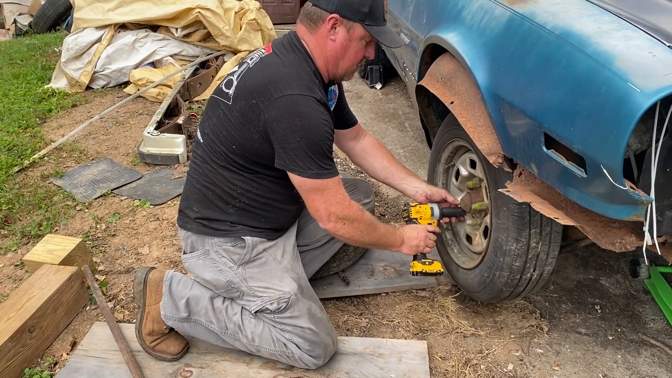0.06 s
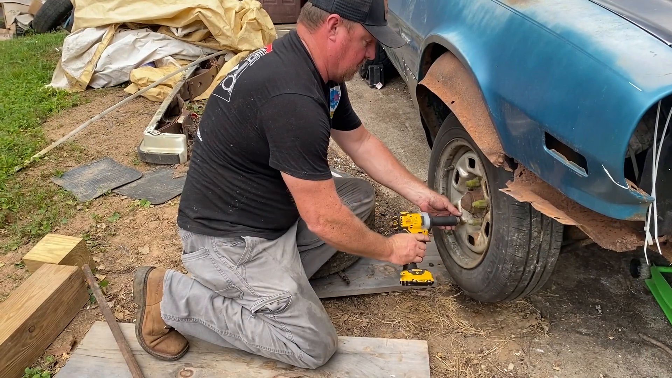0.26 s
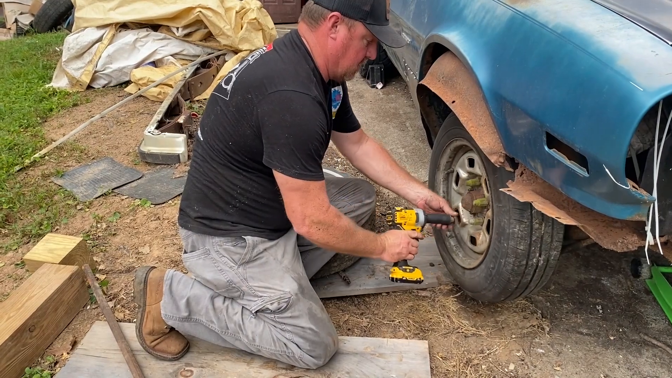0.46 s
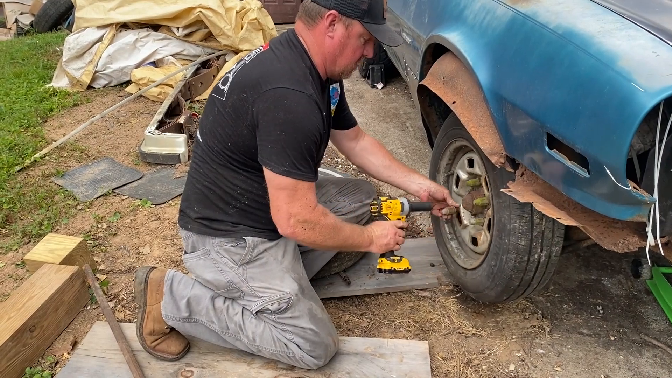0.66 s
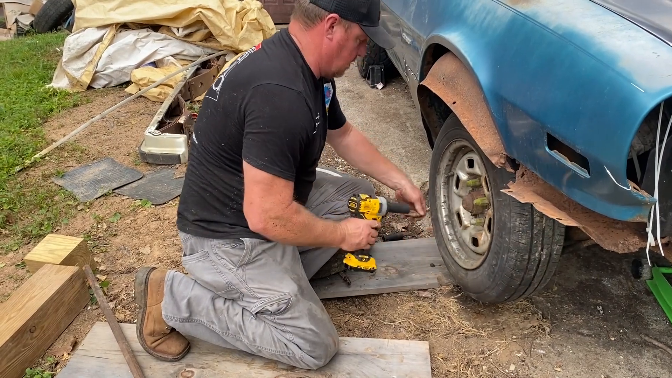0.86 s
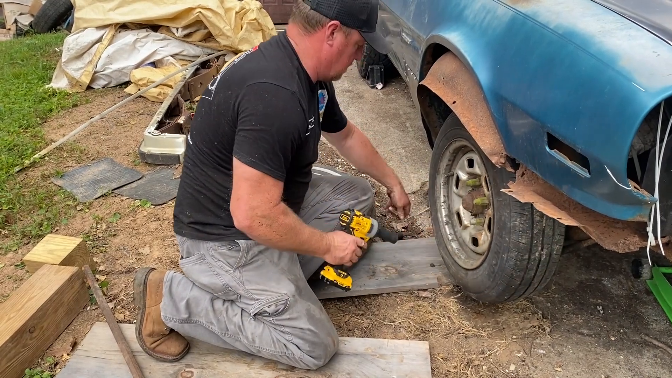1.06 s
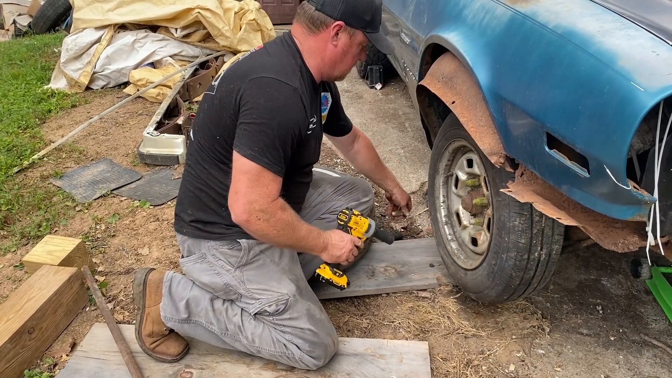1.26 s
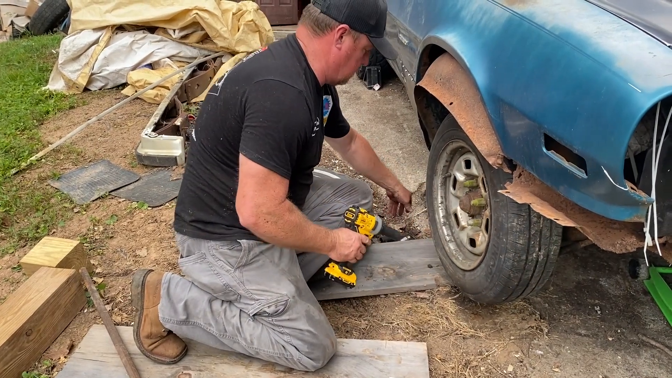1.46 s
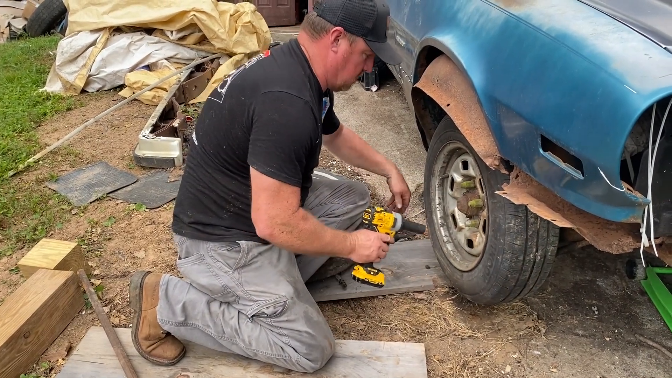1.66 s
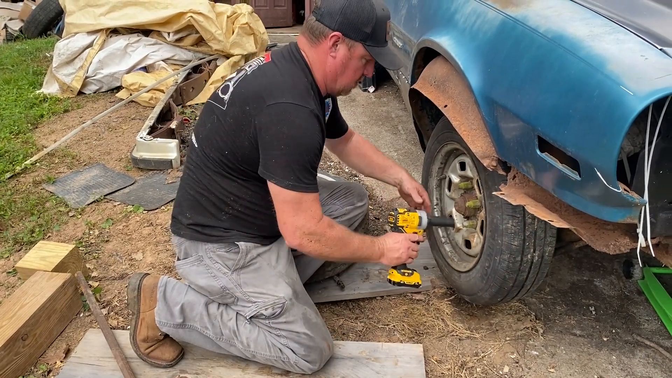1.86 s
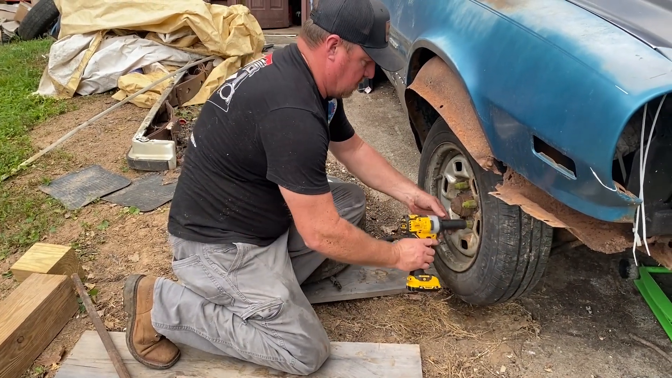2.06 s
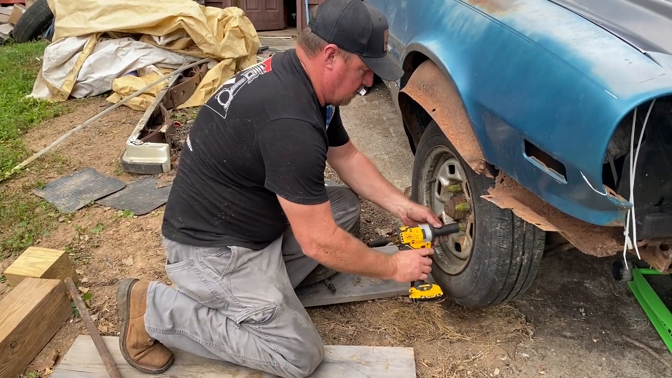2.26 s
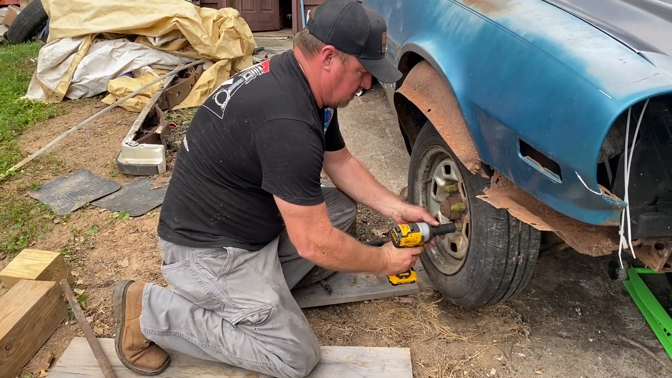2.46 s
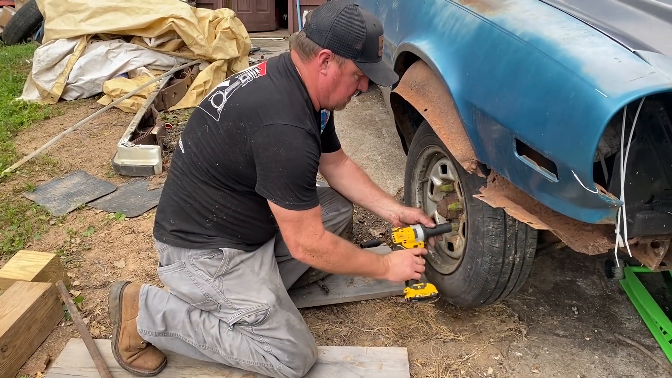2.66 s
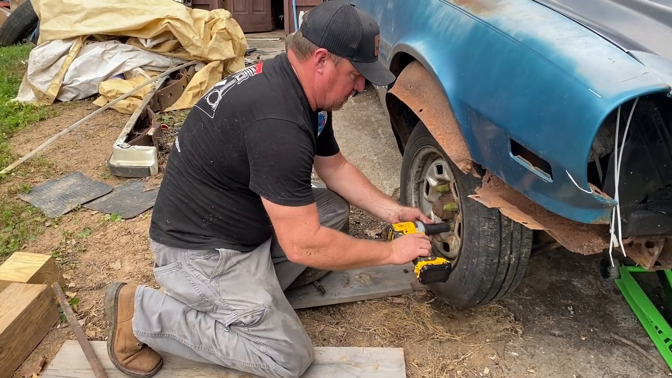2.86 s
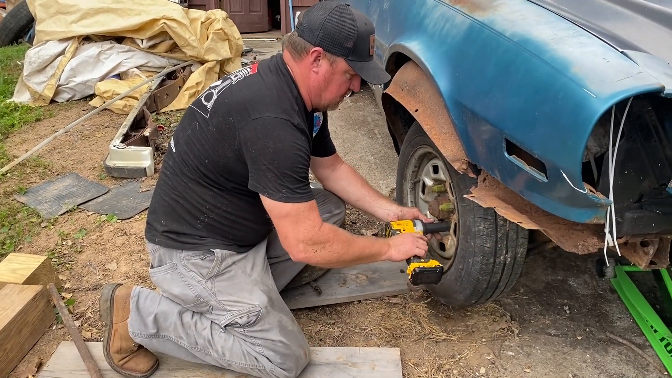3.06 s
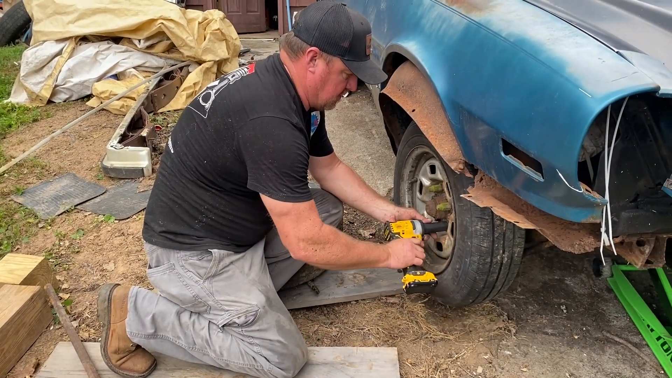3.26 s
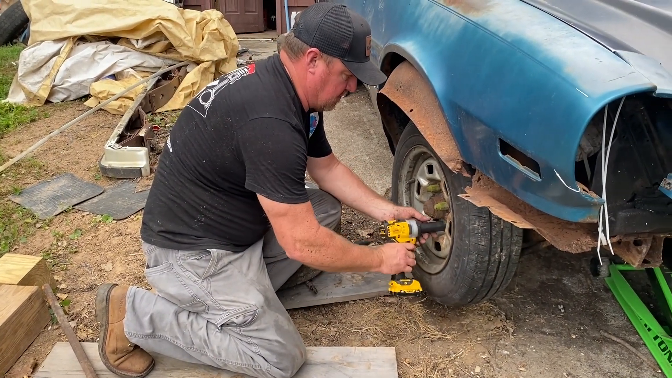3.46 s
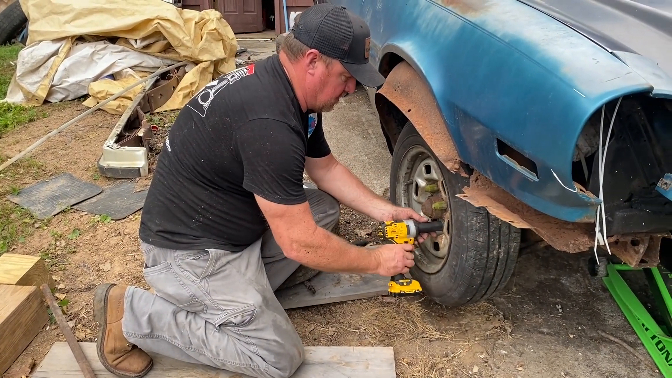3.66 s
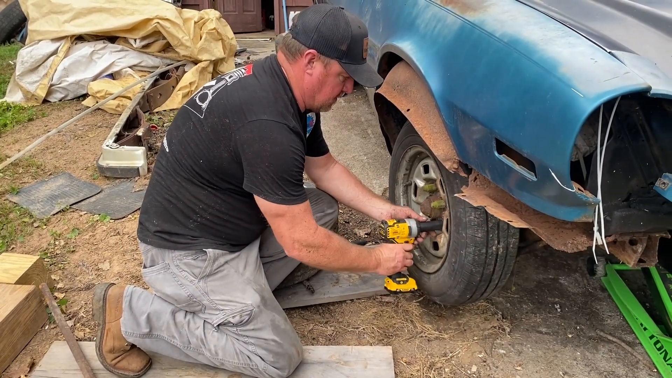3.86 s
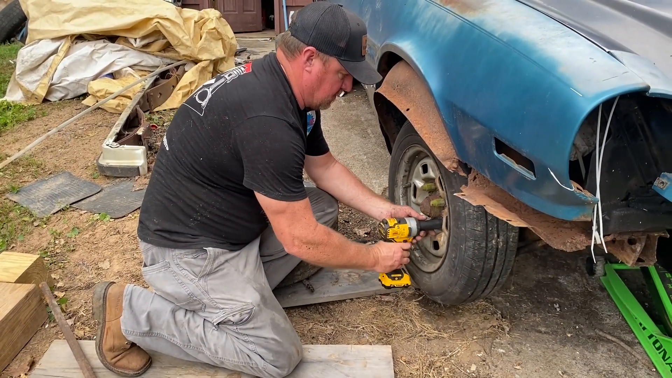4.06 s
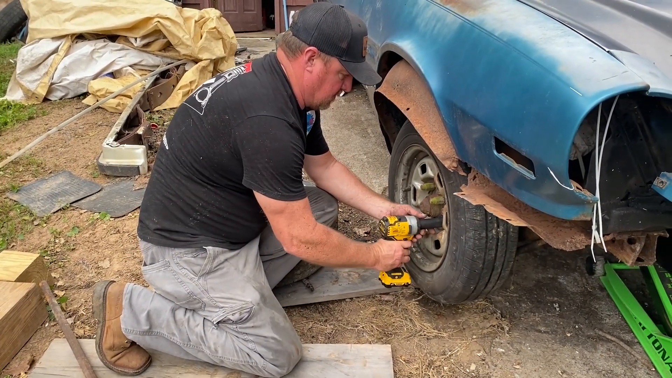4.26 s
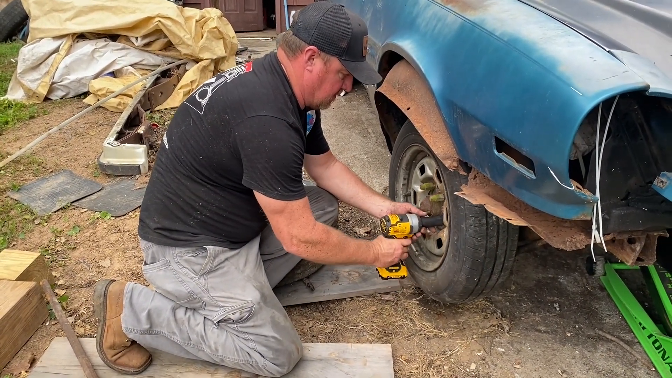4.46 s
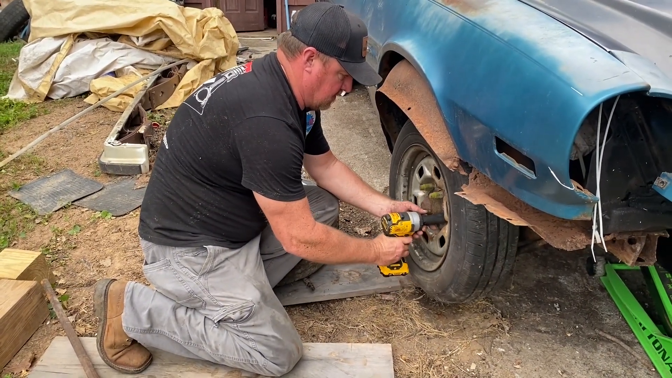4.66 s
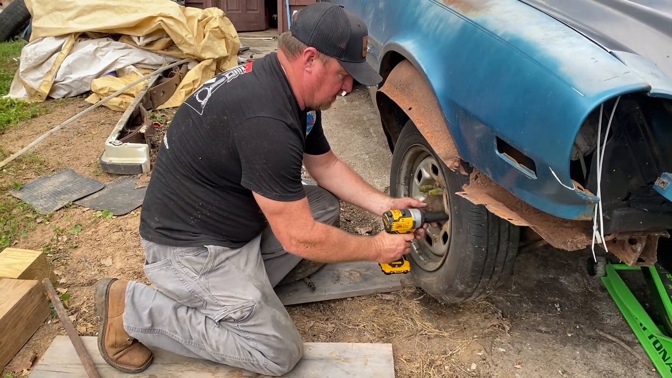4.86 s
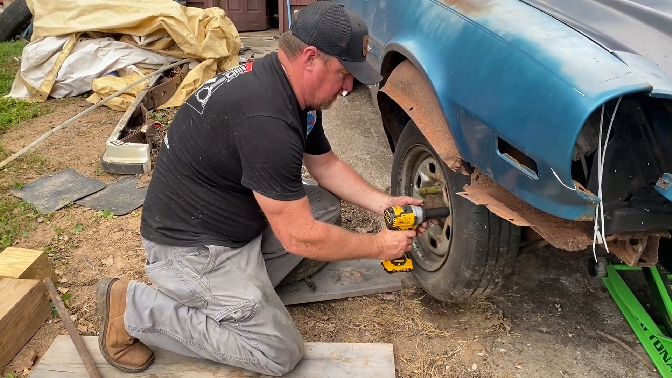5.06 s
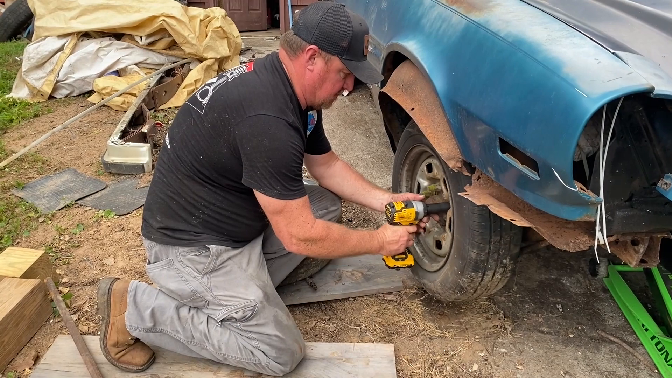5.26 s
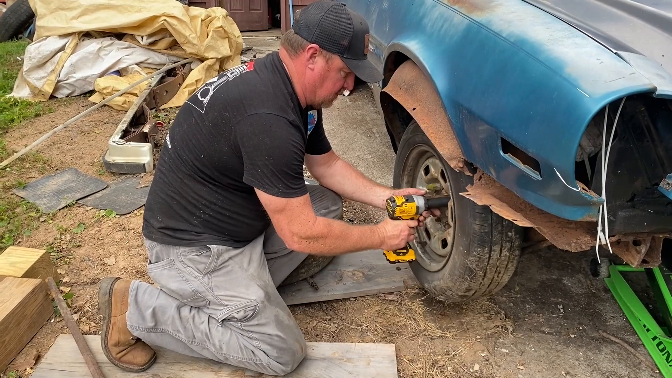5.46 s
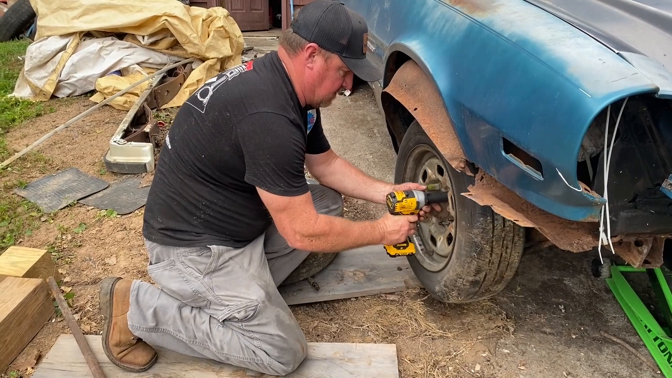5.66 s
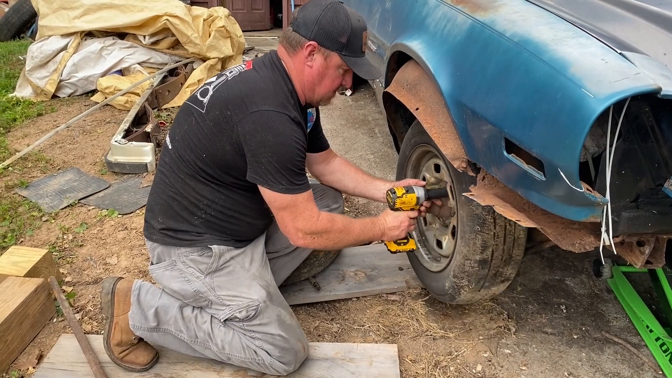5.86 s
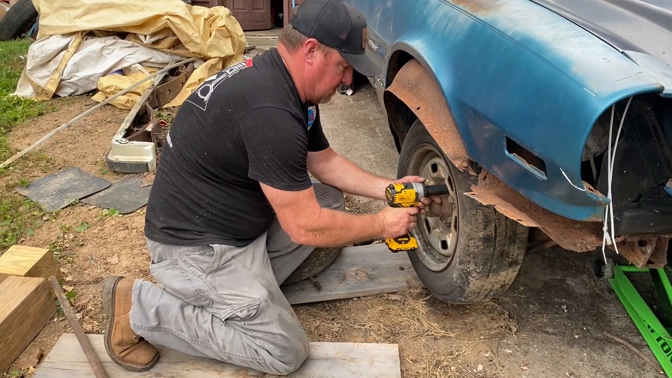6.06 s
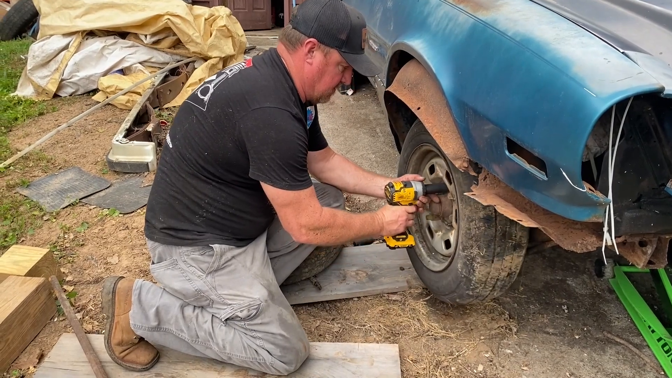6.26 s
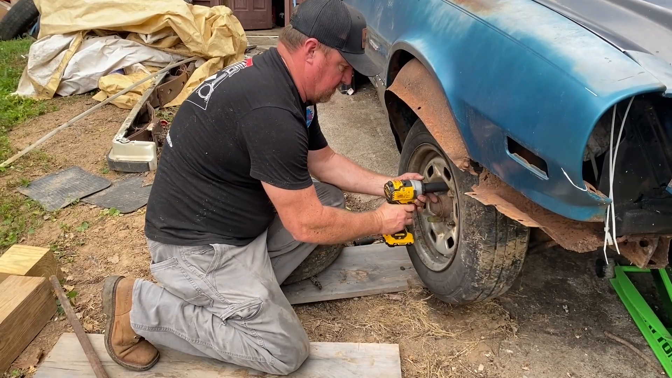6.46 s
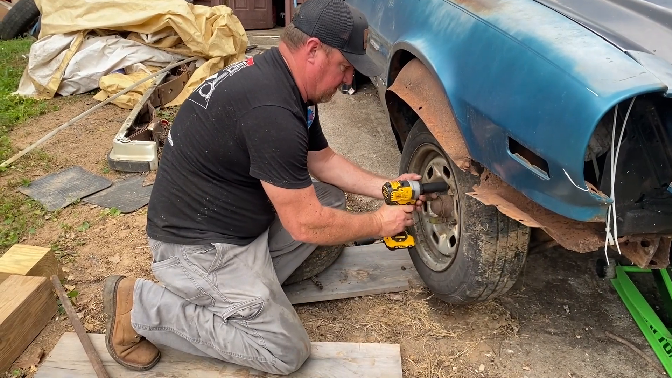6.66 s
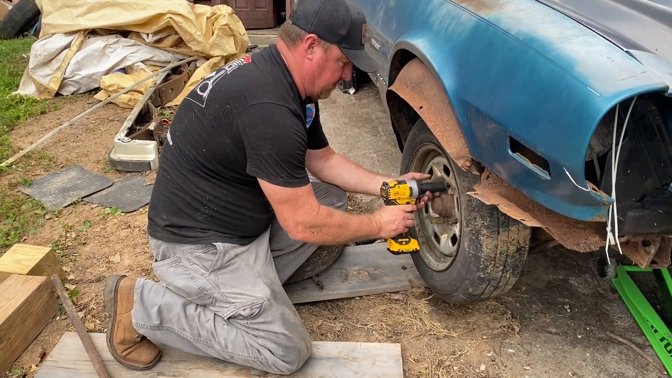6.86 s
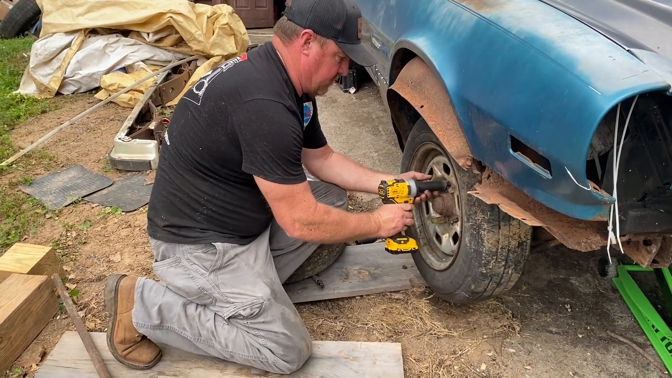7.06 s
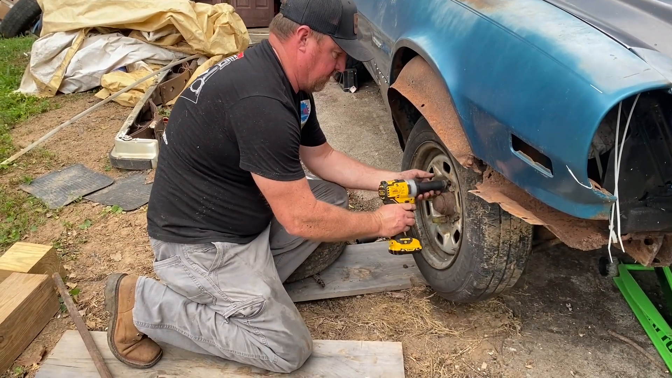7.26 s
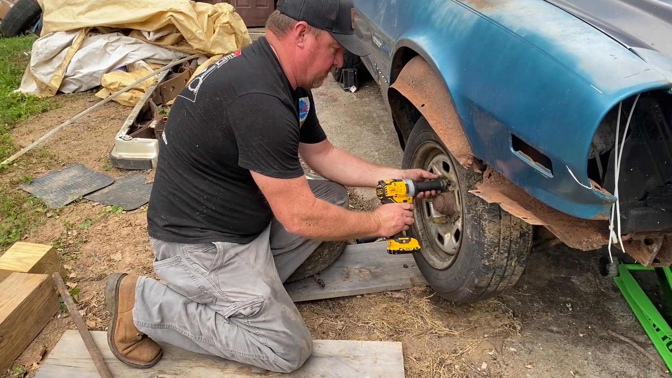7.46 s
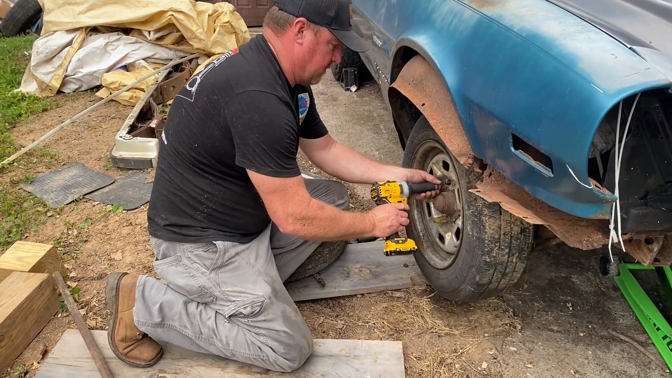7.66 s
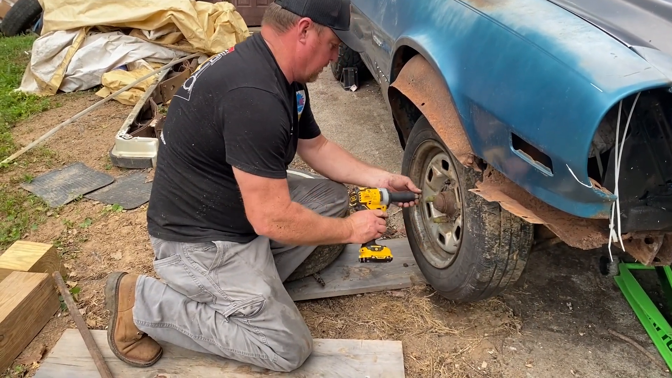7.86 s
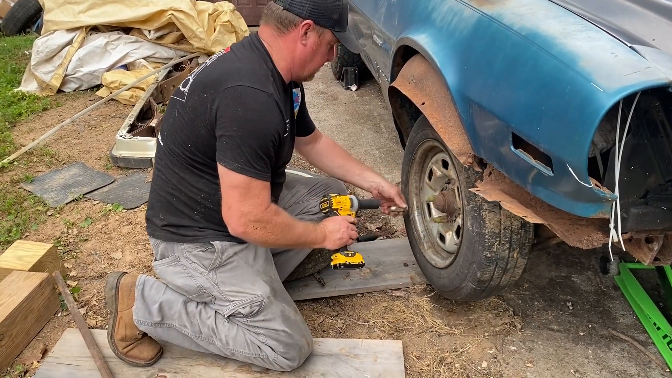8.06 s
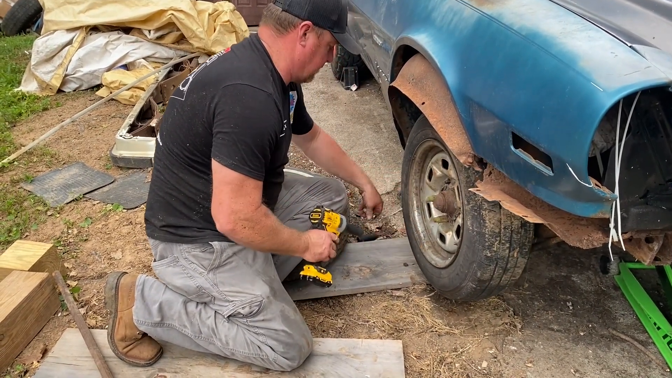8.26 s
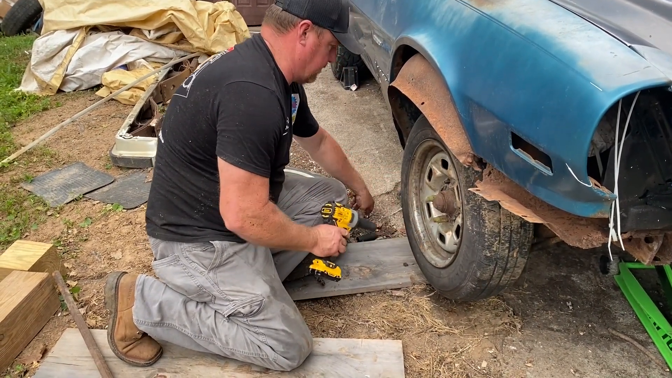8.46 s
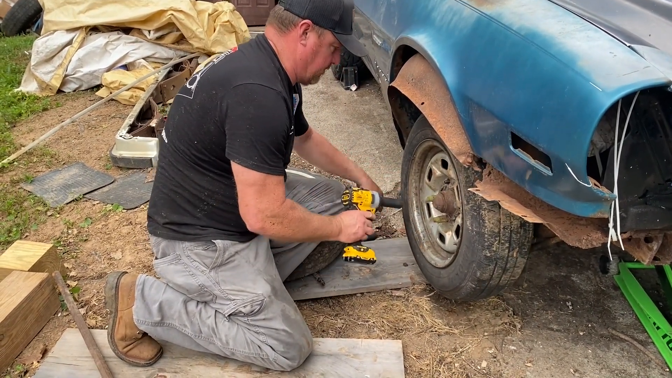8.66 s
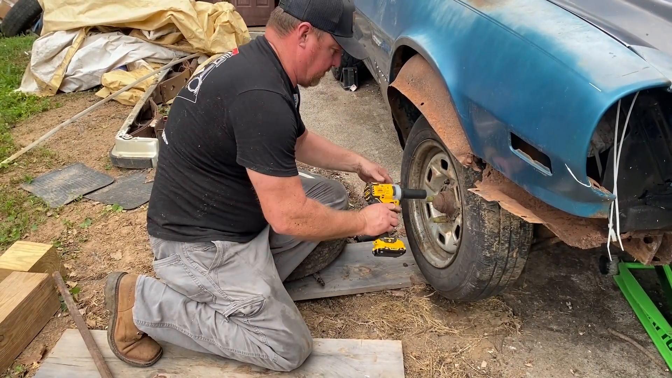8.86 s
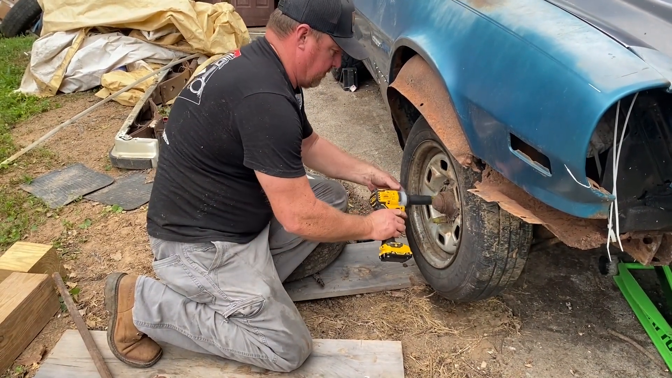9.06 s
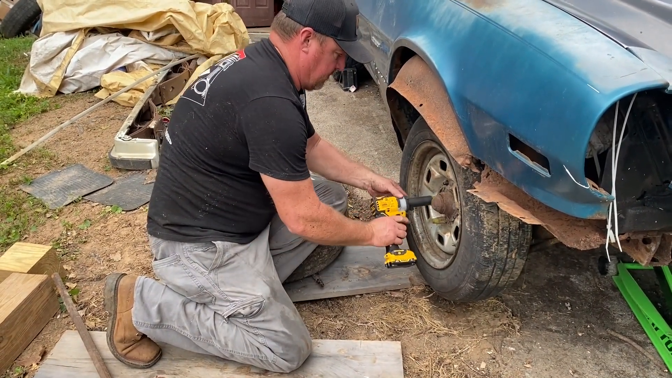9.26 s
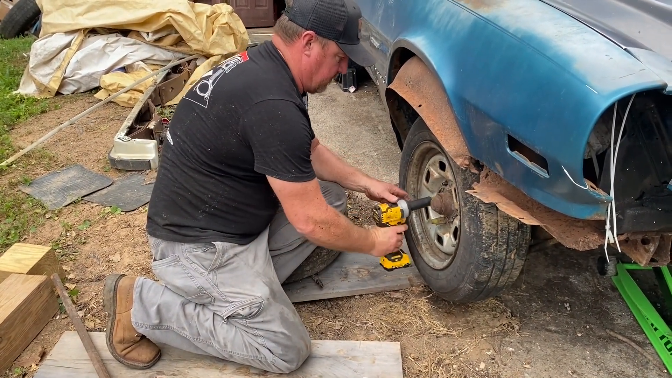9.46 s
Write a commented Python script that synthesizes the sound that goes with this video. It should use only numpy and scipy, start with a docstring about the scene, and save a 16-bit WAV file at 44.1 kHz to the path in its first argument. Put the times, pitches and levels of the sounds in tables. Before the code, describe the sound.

A few faint clinks and dull knocks come first as a socket is fitted to a car wheel nut. Then a nearby cordless impact wrench stutters twice and hammers loudly for about two seconds, each blow sharp and metallic. The blows slow, pick up for a moment, and give way to a brief motor whine. Nuts and socket click afterwards, while far traffic rumbles softly in the open air.

```python
"""Impact wrench on a car wheel

Outdoors, a cordless wrench hammers a lug nut loose: two short bursts, then a long one at about 51
blows a second. Each blow cracks and sets the steel ringing. The hammer slows to single clacks and
rattles again, then the whining motor spins free and brakes. Nuts and socket click against the
wheel before and after, and distant traffic rumbles."""
import sys
import numpy as np
from scipy import signal
from scipy.fft import rfft, irfft, next_fast_len
from scipy.io import wavfile
from scipy.ndimage import map_coordinates

SR = 44100
rng = np.random.default_rng(int(sys.argv[2]) if len(sys.argv) > 2 else 0)


def generate_wav(signal):
    """Clip the signal to [-1, 1] and save it as 16-bit WAV at the path in sys.argv[1]."""
    frames = np.transpose(np.atleast_2d(signal))
    scaled = np.clip(frames, -1, 1) * 32767
    pcm = np.round(scaled).astype(np.int16)
    wavfile.write(sys.argv[1], SR, pcm)


N = 418950
BLOW_RISE_S = .001  # how quickly a blow builds up at 2500 Hz

# The tone colour of a blow. Each row: frequency in Hz, level in dB.
BLOW_COLOUR = [(30, -34), (55, -4), (105, -8), (150, -9), (200, -5.5), (260, -13.5), (380, -6),
               (520, -10.5), (780, -2.5), (1050, 0.5), (1250, -1.5), (1500, 1), (2300, 2.5), (3000, 1.5),
               (3600, -3.5), (7500, -5), (9000, -4.5), (10500, -3.5), (12800, -8.5), (15300, 2.5),
               (16100, -27)]
# The ringing notes of the steel wheel. Each row: pitch in Hz, gain in dB, fade time in seconds.
WHEEL_NOTES = [(1110, -1, 0.11), (1365, 1, 0.08), (2020, 7.5, 0.08), (2115, 9, 0.07), (2262, 10, .06),
               (2630, 10, 0.08), (2717, 16.5, 0.14), (2776, 7, 0.05), (3258, 5, 0.05), (4850, -2, 0.012)]
# A nut sliding in the socket. Each row: pitch in Hz, gain in dB, fade time in seconds.
JINGLE_NOTES = [(1335, 9, 0.11), (2100, 7.5, 0.1), (3413, 1, .1), (4940, 8.5, 0.018)]


def hammer(blows, bright_db=2.5, second_jaw_gain=.3):
    """Each blow is a crack and a short clatter, whose pattern drifts as the socket turns."""
    # How a blow dies away. Each row: top of the band in Hz, fade times of the crack and of its
    # tail in seconds, tail level in dB.
    bands = [(700, .02, 0.11, 4), (1520, .015, 0.1, -11), (3300, 0.014, 0.06, -14.5),
             (7418, 0.006, 0.055, -14.5), (13000, 0.007, 0.043, -7), (17000, 0.01, 0.041, -1)]
    # How closely a blow repeats the last one. Each row: frequency in Hz, likeness from 0 to 1.
    likeness = [(700, .93), (1500, .7), (3300, .7), (7400, .5), (15000, .45)]
    # A loose nut thins the sound. Each row: frequency in Hz, change in dB.
    loose_colour = [(100, -0.5), (680, -0.5), (900, -6.5), (1500, -2.5), (2600, -6.5), (3500, -1.5),
                    (5200, -2.5), (7500, -.5), (11000, 2.5), (15000, -7)]
    t = np.arange(3072) / SR
    jaw_lag_s = np.abs(.0006 + .00025 * wobble(12))
    below = lambda hz, edge: 1 / (1 + (hz / edge) ** 10)
    out, low = np.zeros((2, N)), 0
    for high, crack_s, tail_s, tail_db in bands:
        onset = 1 - np.exp(-(t / BLOW_RISE_S) ** 2 * high / 2500)  # the treble arrives most sharply
        shape = onset * (fade(t, crack_s) + amp(tail_db) * fade(t, tail_s))
        keep = along(likeness, high)
        band, clatter = np.zeros((2, N)), rng.standard_normal((2, len(t)))
        for when, db, shine_db in blows:
            clatter = keep * clatter + np.sqrt(1 - keep ** 2) * rng.standard_normal(clatter.shape)
            treble_db = (shine_db + bright_db) * (low > 2500)  # a square hit brightens the crack
            burst = amp(db + treble_db) * evened(shape * clatter, high / 5)
            add(band, when, burst)
            if low > 1000:  # the hammer's second jaw lands a moment later
                add(band, when + jaw_lag_s[round(when * SR)], second_jaw_gain * burst)
        out += filtered(band, lambda hz: np.sqrt(np.abs(below(hz, high) - below(hz, low + 1))))
        low = high
    tight = filtered(out, lambda hz: unit(amp(along(BLOW_COLOUR, hz))))
    loose, = curves([(4.5, 0), (6.1, 1)])  # the nut comes free between these seconds
    return (1 - loose) * tight + loose * filtered(tight, lambda hz: amp(along(loose_colour, hz)))


def hammer_blows(run_db=-5, clack_db=-18, lead_s=.0012):
    """List each blow's time, level and brightness: runs that gather speed, and single clacks."""
    # Runs of hammering. Each row: start and end in seconds, number of blows, greatest lag while
    # gathering speed in seconds, then relative force, force lost and unevenness, all in dB.
    runs = [(3.3975, 3.559, 9, 0.0038, -21, 1.5, 0.84), (3.7492, 3.794, 3, 0.00048, -21.5, -2.5, 0.4),
            (3.9671, 4.2345, 14, 0.0052, -20.5, 4.5, 1.12), (4.2582, 4.295, 3, 0.00097, -30, 1, 1),
            (4.3214, 5.924, 83, .008, -25, 4.5, 1.96), (6.275, 6.515, 13, 0.0026, -30.5, -0.5, .5)]
    # The blows swell as the wrench is leaned on. Each row: time in seconds, change in dB.
    swell = [(3.8, -1.5), (3.97, -5), (4.05, 0.5), (4.12, -1), (4.17, -2.5), (4.35, -1.5), (4.41, -2.5),
             (4.49, 0.5), (4.62, -1.5), (4.68, -0.5), (4.86, -3), (5.07, 1.5), (5.28, 0), (5.55, -0.5),
             (5.7, -0.5), (5.9, 0)]
    # The slow hammer catches or slips over the anvil, the part it strikes.
    # Each row: time in seconds, relative level in dB, brightness in dB.
    single_clacks = [(3.368, -16, -10.5), (3.581, -10.5, -5.5), (3.604, -24.5, 2), (3.739, -19.5, -11.5),
                     (3.816, -11, -1.5), (3.835, -20.5, -8.5), (3.96, -22.5, -13), (5.949, -13, -4.5),
                     (6.001, -17, -2.5), (6.062, -16, -3.5), (6.122, -16.5, -1.5), (6.188, -17, -3.5),
                     (6.249, -18.5, 0.5), (6.538, -16.5, -2.5)]
    rows = []
    for first, last, count, lag_s, force_db, lost_db, scatter_db in runs:
        k = np.arange(round(count))
        progress = k / k[-1]
        opening_db = 3 * np.exp(-k / 1.5)  # a run opens heavier and duller
        chance = rng.standard_normal((len(k), 2))
        times = first + (last - first) * progress + lag_s * 27 / 4 * progress * (1 - progress) ** 2
        level = run_db + force_db - lost_db * progress + opening_db + scatter_db * chance[:, 0]
        level += np.interp(times, *np.transpose(swell))
        brightness = .85 * chance[:, 1] - opening_db
        rows.append(np.column_stack([times - lead_s, level, brightness]))
    clacks = np.array(single_clacks) + [0, clack_db, 0]
    rebounds = clacks + [.0145, -8, -3]  # the hammer falls back once: later, softer, duller
    return np.vstack(rows + [clacks, rebounds])


def punches(blows, boost_db=34.5):
    """The clean push that each blow sends into the wheel through the stud, the bolt under the nut."""
    out = np.zeros((2, N))
    for (when, db, _), sign in zip(blows, rng.choice([-1, 1], (len(blows), 2, 1))):
        add(out, when + BLOW_RISE_S, sign * amp(db + boost_db))
    return filtered(out, lambda hz: unit(amp(along(BLOW_COLOUR, hz))))


def steel_ring(blows, clatter, rocking_db=1.2, weak_swing_db=4, groups=4):
    """The blows ring the wheel while the nut is tight, then the loose nut, and at last the socket."""
    # Where the blows go. Each row: time in seconds, then gains in dB for wheel, nut, socket, stud.
    grip = [(3.4, -5.5, -9, -20, -5.5), (4.1, -3, -23.5, -26, 3), (4.5, -1, -24, -28.5, -12),
            (5.2, -4.5, -23, -24, -25), (5.401, -5.5, -16, -12.5, -15.5), (5.62, -16.5, 0, -33, -14),
            (5.95, -10, 1.5, -21, -14), (6.27, -14.5, -25, -1.5, -16)]
    # Notes of the rattling nut, the socket and the stud.
    # Each row: pitch in Hz, gain in dB, fade time in seconds.
    nut_notes = [(674, -5, 0.02535), (1124, -0.5, 0.094), (1370, 7.5, 0.028), (1830, 3, .018),
                 (1950, 0.5, 0.026), (2750, 1, 0.072), (2928, -8.5, .05), (4040, -3.5, .012),
                 (6760, 3.5, 0.0091)]
    socket_notes = [(665, -17.5, 0.073), (1140, 5.5, .06), (1347, 3, 0.029), (1940, 3.5, 0.044),
                    (2435, 10, 0.011), (3620, -0.5, 0.0085), (3930, 8, 0.011), (6930, -3, 0.0065),
                    (10000, -6.5, .005)]
    stud_notes = [(4330, 1.5, .09), (5510, -3.5, 0.094), (6070, 4.5, .1), (6870, -1, .018)]
    # The loosening nut slides in the socket: start and end in seconds, gain in dB.
    nut_slide = (4.1, 5.1, -7)
    wheel_db, *parts_db = curves(grip)
    ring = ringing(punches(blows) * amp(wheel_db), WHEEL_NOTES)
    for db, notes in zip(parts_db, [nut_notes, socket_notes, stud_notes]):
        ring += ringing(clatter * amp(db + rocking_db * wobble(30)), notes)  # the socket rocks
    weak_notes = weak_wheel_notes()
    for k in range(groups):  # each group comes and goes on its own
        ring += ringing(clatter * amp(wheel_db + weak_swing_db * wobble(11)), weak_notes[k::groups])
    start, end, slide_db = nut_slide
    return ring + ringing(clatter * amp(slide_db) * gate(start, end, .02, .05), JINGLE_NOTES)


def weak_wheel_notes(count=36, low_hz=2900, high_hz=12000, gain_db=-9, fade_s=.075):
    """Scatter the wheel's many weaker ringing notes across the treble."""
    place = (np.arange(count) + rng.random(count)) / count
    pitches = low_hz * (high_hz / low_hz) ** place
    return [(hz, db, fade_s) for hz, db in zip(pitches, rng.normal(gain_db, 1.3, count))]


def motor(mesh_hz=1885, spin_up_s=.026, brake_s=.075, whine_db=1.8, flutter=.62):
    """Gears whine and whir as the motor runs; at speed 1 their teeth meet at mesh_hz."""
    # Stretches of motor whine and whir.
    # Each row: start and end in seconds, relative speed, relative level in dB.
    motor_stretches = [(3.345, 3.554, 0.91, -43), (3.694, 3.734, 0.79, -46.5), (3.719, 3.789, 0.82, -35),
                       (3.921, 5.945, 0.84, -41.5), (5.95, 6.264, 0.37, -45), (6.248, 6.791, 1, -47)]
    # With the load off, the speed swings. Each row: time in seconds, speed multiplier.
    # The first multiplier also holds for all earlier times.
    speed_swing = [(6.54, 1.14), (6.587, 1.03), (6.62, 1), (6.655, 1.005), (6.705, .975), (6.775, 1.03)]
    # The tones of the whine. Each row: multiple of the tooth rate, relative level in dB.
    harmonics = [(1, 0), (2, -3), (3, -7.5), (4, -3.5), (6, -12)]
    # The colour of the whir. Each row: frequency in Hz, level in dB.
    whir_colour = [(150, -5), (700, -4.5), (1500, 1.5), (2300, 1.5), (4000, 1), (7500, -6.5),
                   (11000, -11.5), (15500, -15), (16200, -32.5)]
    speeds = [share * gate(start, end, spin_up_s, brake_s) for start, end, share, _ in motor_stretches]
    levels = [amp(db) * np.sqrt(speed) for (*_, db), speed in zip(motor_stretches, speeds)]
    level = np.max(levels, axis=0)
    speed = np.max(speeds, axis=0) * curves(speed_swing)[0]
    phase = 2 * np.pi * np.cumsum(mesh_hz * speed * (1 + .008 * wobble(90))) / SR
    throb = np.sin(phase / 16.5)  # once per turn of the gear
    tooth = phase + .38 * throb + .23 * wobble(600)  # play between the teeth
    tones = [amp(db) * (1 + flutter * wobble(420)) * np.sin(k * tooth) * speed ** (2 * k + 1)
             for k, db in harmonics]  # the upper tones only sing near full speed
    whine = amp(whine_db) * sum(tones)
    return level * (1 + .3 * throb) * (noise(whir_colour) + whine * [[1], [0]])


def handling(click_db=-12, knock_db=9, shine_db=4, ring_db=-9, chatter_s=.069, snap_s=.0012):
    """Steel touches steel: a snap and a chatter ring the wheel, and the socket scrapes on a nut."""
    # Socket and nuts touch the wheel. Each row: time in seconds, then relative level, bass and
    # treble, all in dB.
    touches = [(1.459, -29.5, -22, 2.5), (2.035, -40.5, -0.5, -14), (2.071, -33.5, -8, -26),
               (2.08, -28.5, -5, -7), (2.385, -48.5, 4, -7), (2.529, -49.5, 7, -19), (2.858, -48, 1.5, -18),
               (3.101, -36, 7, -8.5), (3.155, -30.5, 7.5, -4.5), (7.08, -41.5, -22, -5),
               (7.109, -22, -45, 2), (7.167, -37, -30, 4.5), (7.196, -44, -20, -6), (7.226, -29, -16, -1.5),
               (7.521, -28, -22, -4.5), (7.599, -41.5, -32, -10.5), (7.631, -44.5, -13, -17),
               (9.019, -42.5, 4, -20.5), (9.09, -35, -10, -5.5), (9.195, -38, -14, -16)]
    # The colour of clicks and scrapes. Each row: frequency in Hz, level in dB.
    colour = [(150, -10.5), (600, -1), (1400, 7.5), (2300, 3.5), (3600, 2), (6500, -2.5), (8500, -10.5),
              (11000, -7), (15500, -15), (16200, -28)]
    # Scrapes. Each row: start and end in seconds, level in dB.
    scrapes = [(2.39, 2.47, -76.5), (2.639, 2.72, -76.5), (7.076, 7.194, -55.5), (7.46, 7.516, -66.5),
               (7.516, 7.624, -61)]
    t = np.arange(SR // 5) / SR
    shape = fade(t, chatter_s) + .5 * fade(t, snap_s)
    clicks = np.zeros((2, N))
    for when, db, bass_db, treble_db in touches:
        tilt = [(700, bass_db + knock_db), (1600, 0), (3000, 0), (5500, treble_db + shine_db)]
        white = rng.standard_normal((2, len(t)))
        chatter = unit(filtered(white, lambda hz: amp(along(colour, hz) + along(tilt, hz))))
        add(clicks, when, amp(db + click_db) * chatter * shape)
    pressure = sum(amp(db) * gate(start, end, rise_s=.013, fall_s=.0093) for start, end, db in scrapes)
    scrape = pressure * unit(noise(colour) * amp(2.9 * wobble(300)))
    return clicks + amp(ring_db) * ringing(clicks, WHEEL_NOTES) + scrape + ringing(scrape, JINGLE_NOTES)


def socket_clinks():
    """The socket is pushed over a nut and rings briefly."""
    # Each row: time in seconds, level in dB.
    pushes = [(2.036, -44), (2.07, -38.5)]
    # The socket's notes. Each row: pitch in Hz, relative level in dB, fade time in seconds.
    notes = [(2089, -11, .16), (2220, 5.5, 0.048), (2300, -5, 0.15), (2460, -5, .03), (2719, -13.5, 0.24),
             (3320, -19, 0.088)]
    t = np.arange(SR // 3) / SR
    out = np.zeros(N)
    for when, db in pushes:
        for hz, note_db, fade_s in notes:
            tone = np.sin(2 * np.pi * hz * t + rng.uniform(0, 2 * np.pi))
            add(out, when, amp(db + note_db) * tone * fade(t, fade_s))
    return out


def knocks(thud_width=.34, thud_rise_s=.00079):
    """Small steel parts ping when touched; knocks on board and tyre give dull thuds."""
    # Each row of both tables: time in seconds, pitch in Hz, level in dB, fade time in seconds.
    pings = [(1.461, 15070, -43.5, 0.35), (3.583, 2766, -36.5, 0.29), (6.061, 1990, -19.5, .03),
             (7.109, 10310, -25, 0.0097), (7.109, 1376, -47, 0.15), (7.226, 1400, -44, 0.05),
             (7.226, 10230, -24, 0.0065), (9.093, 2110, -50.5, 0.26), (9.193, 1040, -44.5, 0.046)]
    thuds = [(1.5, 856, -40, 0.061), (1.507, 356, -33.5, 0.036), (1.52, 247, -38, 0.069),
             (2.081, 157, -53.5, 0.58), (3.106, 140, -47, 0.94), (3.158, 179.5, -47, 0.15),
             (3.601, 120, -42.5, 0.82), (3.8, 132, -39, 0.73)]
    t = np.arange(SR // 2) / SR
    out = np.zeros(N)
    for when, hz, db, fade_s in pings:
        add(out, when, amp(db) * np.sin(2 * np.pi * hz * t) * fade(t, fade_s))
    for when, centre_hz, db, fade_s in thuds:
        white = rng.standard_normal(len(t))
        body = filtered(white, lambda hz: 1 / (1 + (np.log((hz + 1) / centre_hz) / thud_width) ** 4))
        add(out, when, amp(db) * unit(body) * fade(t, fade_s) * (1 - np.exp(-t / thud_rise_s)))
    return out


def near_echo(x, level_db=-24):
    """Car body, ground and nearby walls send back a weak echo."""
    # Each row: frequency in Hz, fade time in seconds.
    fade_times = [(200, 0.6), (2000, 0.15), (12000, 0.12)]
    hz, t, spectrum = signal.stft(rng.standard_normal((2, SR // 3)), SR, nperseg=256)
    tail = signal.istft(spectrum * fade(t, along(fade_times, hz)[:, None]), SR, nperseg=256)[1]
    return amp(level_db) * signal.fftconvolve(x, tail / np.linalg.norm(tail[0]), axes=1)[:, :N]


def far_echo(x, fade_s=.49, level_db=-19, dull_hz=3512):
    """Farther buildings send back a faint, dull tail."""
    tail = rng.standard_normal((2, SR)) * fade(np.arange(SR) / SR, fade_s)
    echo = signal.fftconvolve(x, tail / np.linalg.norm(tail[0]), axes=1)[:, :N]
    return amp(level_db) * filtered(echo, lambda hz: 1 / np.sqrt(1 + (hz / dull_hz) ** 2))


def traffic(drone_hz=113, nearest_s=9.26, approach_s=3.13):
    """Far traffic rumbles and hisses and one engine draws closer, over faint tones and a thin sizzle."""
    # Colours of the rumble, the far hiss, the nearing tyres and the high sizzle.
    # Each row: frequency in Hz, relative level in dB.
    rumble_colour = [(20, -33), (32, -25), (50, 4.5), (110, 1), (160, -7), (250, -15), (400, -20),
                     (700, -37), (1500, -70)]
    hiss_colour = [(250, 11), (500, 1.5), (1300, 1.5), (2000, -5.5), (2700, -3), (4000, -14.5),
                   (6500, -22.5), (11000, -41), (14000, -33.5)]
    tyre_colour = [(400, -14), (1000, -3.5), (1500, 1.5), (2500, 4), (3300, -8.5), (4400, -10),
                   (6500, -12.5), (9000, -30), (14000, -38)]
    sizzle_colour = [(2000, -34), (5000, -9.5), (6600, -22.5), (7400, -2), (7850, 3), (8600, -9.5),
                     (11000, -19.5), (14000, -43.5)]
    # Faint steady tones. Each row: pitch in Hz, level in dB.
    hum_tones = [(236.9, -69), (2584, -84.5)]
    near, = curves([(nearest_s - approach_s, 0), (nearest_s, 1), (nearest_s + approach_s, 0)])
    rumble = amp(-56.5 + 1.5 * wobble(6)) * stereo(noise(rumble_colour), [(100, .96), (500, .71)])
    hiss = amp(-67.5 + .25 * wobble(4.4)) * stereo(noise(hiss_colour), [(1000, .022), (7000, .29)])
    tyres = amp(-65 + .42 * wobble(2.5)) * stereo(noise(tyre_colour), [(1000, .08), (7000, .47)])
    sizzle = amp(-76) * stereo(noise(sizzle_colour), [(7000, 1.0)])
    drone = amp(-66 + 12 * near + 3 * wobble(21)) * drifting_tone(drone_hz, drift_hz=1.1)
    hum = sum(amp(db) * drifting_tone(hz, drift_hz=1.9) for hz, db in hum_tones)
    return rumble + hiss + near ** 2 * tyres + sizzle + drone + hum


def drifting_tone(hz, drift_hz):
    """A pure tone whose pitch wanders a little."""
    return np.sqrt(2) * np.sin(2 * np.pi * np.cumsum(hz + drift_hz * wobble(8.2)) / SR)


def ringing(drive, notes):
    """A shaken steel part rings on at its own notes; each note's dB is its gain at that pitch."""
    t = np.arange(SR // 3) / SR
    ring = sum(amp(db) * np.cos(2 * np.pi * hz * t) * 2 * fade(t, fade_s) / fade(t, fade_s).sum()
               for hz, db, fade_s in notes)
    return signal.oaconvolve(drive, ring[None], axes=1)[:, :N]


def evened(burst, hz):
    """Flatten chance bumps wider than hz in a burst's colour, without smearing its sharp start."""
    size = burst.shape[-1] + 1024
    spectrum = rfft(burst, size)
    bumps = irfft(np.log(np.abs(spectrum) + 1e-9))  # sorted from wide to narrow
    bumps[:, round(SR / hz):] = 0
    bumps[:, 0] = 0
    return unit(irfft(spectrum * np.exp(-2 * rfft(bumps)))[:, :burst.shape[-1]])


def noise(colour):
    """Two unrelated noises of strength 1 with the given colour."""
    return unit(filtered(rng.standard_normal((2, N)), lambda hz: amp(along(colour, hz))))


def stereo(pair, alike):
    """Mix two signals into left and right; rows of alike give frequency in Hz and likeness."""
    turn = lambda hz: np.arccos(np.clip(along(alike, hz), -1, 1)) / 2
    mid, side = filtered(pair, lambda hz: np.array([np.cos(turn(hz)), np.sin(turn(hz))]))
    return np.array([mid + side, mid - side])


def filtered(x, response):
    """Multiply each frequency in x by response(hz)."""
    size = x.shape[-1]
    padded = next_fast_len(size + 4096)
    return irfft(rfft(x, padded) * response(np.fft.rfftfreq(padded, 1 / SR)), padded)[..., :size]


def fade(t, fade_s):
    """Die away by 60 dB over the fade time."""
    return np.exp(-np.log(1000) * t / fade_s)


def gate(start, end, rise_s, fall_s):
    """Rise to 1 from start, hold, and fall to 0 after end."""
    t = np.arange(N) / SR
    return np.clip((t - start) / rise_s, 0, 1) * np.clip(1 - (t - end) / fall_s, 0, 1)


def wobble(rate):
    """A smooth curve through rate random points a second."""
    return map_coordinates(rng.standard_normal(int(N * rate / SR) + 4), [np.arange(N) * rate / SR])


def curves(rows):
    """Turn each column after the time into one value per sample."""
    times, *columns = np.transpose(rows)
    return [np.interp(np.arange(N) / SR, times, column) for column in columns]


def along(points, hz):
    """Read between (Hz, value) points on a logarithmic frequency scale."""
    frequencies, values = np.transpose(points)
    return np.interp(np.log(hz + 1), np.log(frequencies + 1), values)


def add(track, when, sound):
    """Mix a sound into a track at a time in seconds."""
    part = track[..., round(when * SR):][..., :sound.shape[-1]]
    part += sound[..., :part.shape[-1]]


def amp(db):
    """Turn decibels into gain."""
    return 10 ** (np.asarray(db) / 20)


def unit(x):
    """Scale to an average strength (rms) of 1."""
    return x / np.sqrt(np.mean(x ** 2) + 1e-20)


def scene():
    """The wrench at the wheel, the handling around it, their echoes and the traffic."""
    # How alike left and right are. Each row: frequency in Hz, likeness from 0 to 1.
    alike = [(100, 1), (350, .98), (550, .75), (900, .86), (1300, .77), (2000, .95), (3500, .92),
             (5700, .72), (7000, .95), (15000, .91)]
    # Where the wrench is heard. Each row: frequency in Hz, left level over right in dB.
    balance = [(100, -1.5), (400, -3), (750, -5), (1400, -1), (2500, 0.5), (4000, 0.5), (6000, 3.5),
               (8000, 0)]
    blows = hammer_blows()
    clatter = hammer(blows)
    wrench = clatter + steel_ring(blows, clatter) + motor()
    work = stereo(wrench + handling() + socket_clinks(), alike) + knocks()
    work = filtered(work, lambda hz: amp(along(balance, hz) * np.array([[.5], [-.5]])))
    return work + near_echo(work) + far_echo(work) + traffic()


def record(dry, top_hz=16600):
    """The microphone's two openings fall out of step in the treble; peaks round off; the top is cut."""
    # Each row: frequency in Hz, phase between left and right in whole cycles.
    phase_gap = [(7000, 0), (9000, -.5), (11200, -1), (13200, -1.5), (15300, -2)]
    half_gap = lambda hz: np.pi * np.interp(hz, *np.transpose(phase_gap))
    shifted = filtered(dry, lambda hz: np.exp(1j * half_gap(hz) * np.array([[1], [-1]])))
    rounded = shifted / (1 + np.abs(shifted) ** 6) ** (1 / 6)
    return filtered(rounded, lambda hz: hz < top_hz)


dry = scene()
out = record(dry)
generate_wav(out)
```